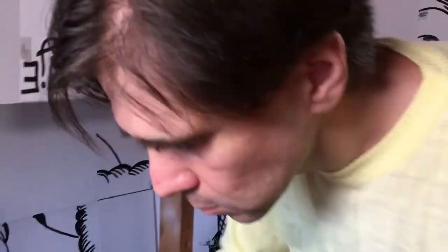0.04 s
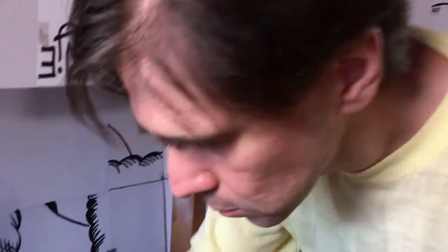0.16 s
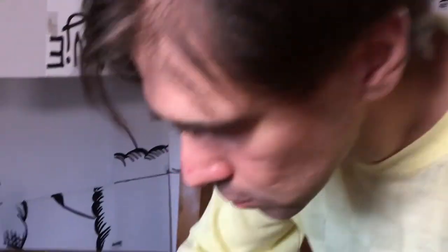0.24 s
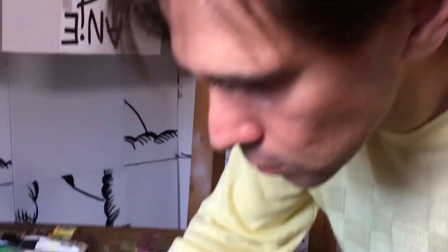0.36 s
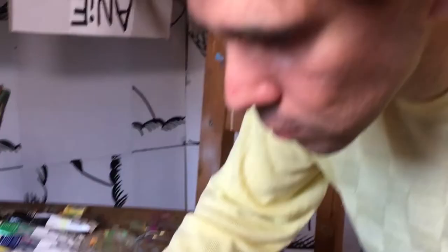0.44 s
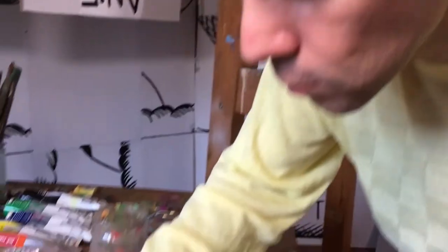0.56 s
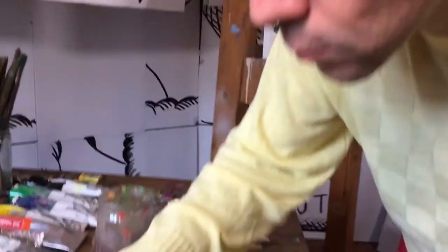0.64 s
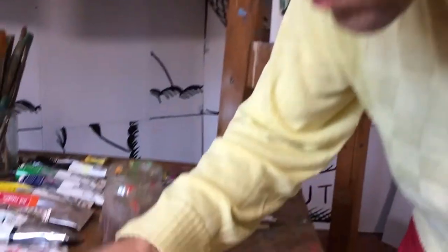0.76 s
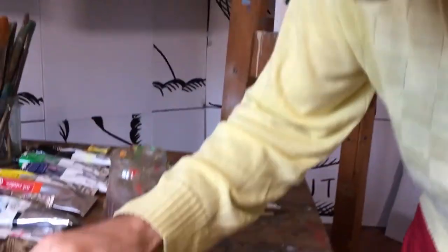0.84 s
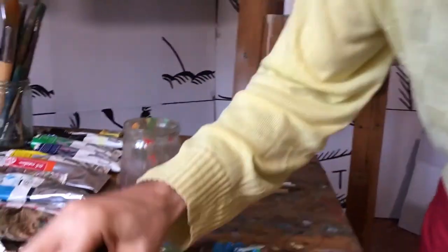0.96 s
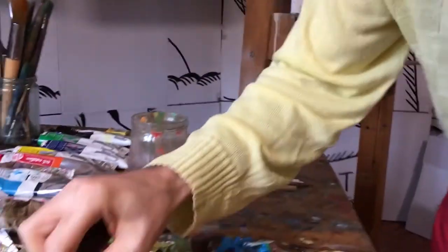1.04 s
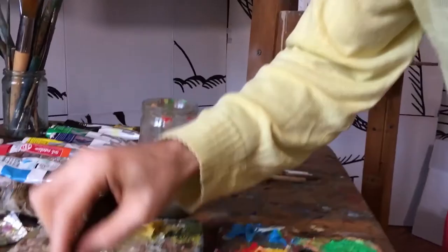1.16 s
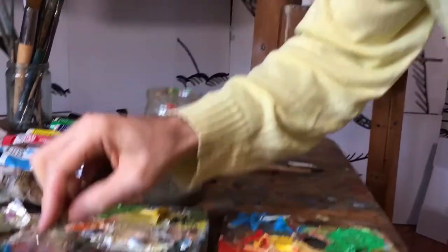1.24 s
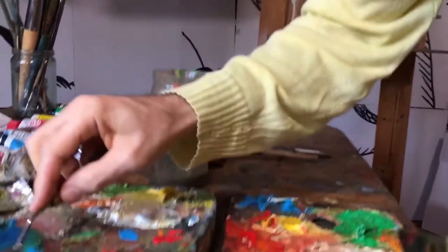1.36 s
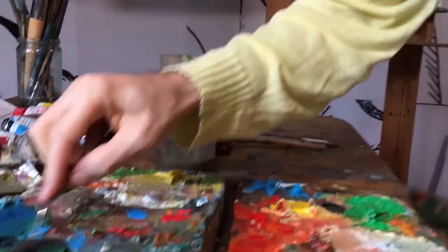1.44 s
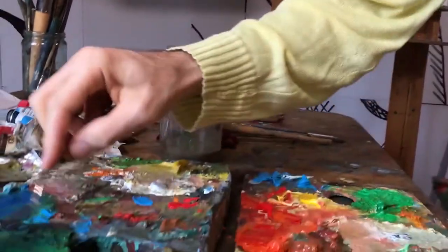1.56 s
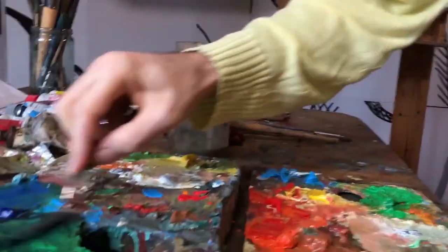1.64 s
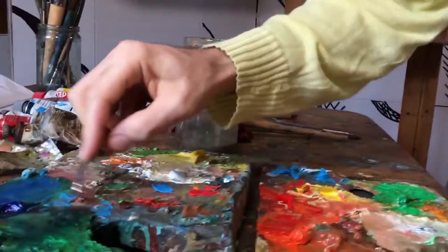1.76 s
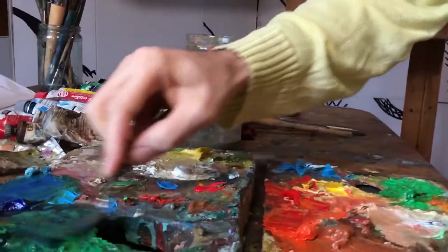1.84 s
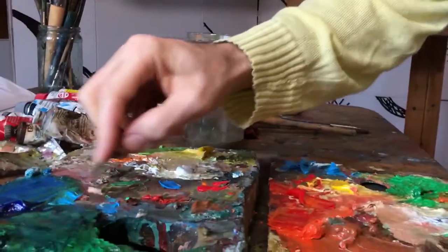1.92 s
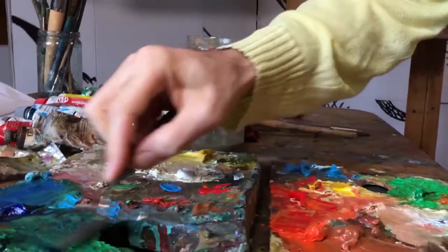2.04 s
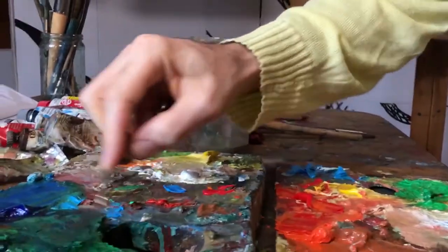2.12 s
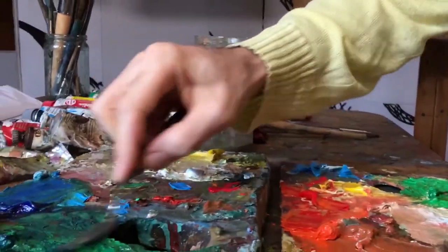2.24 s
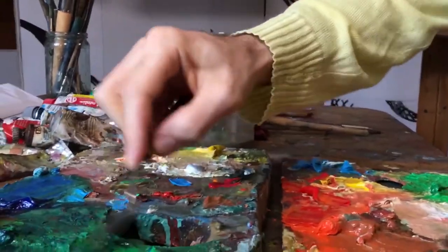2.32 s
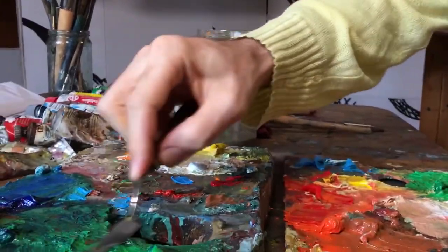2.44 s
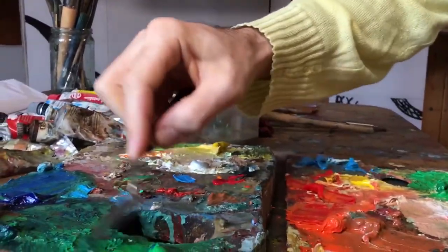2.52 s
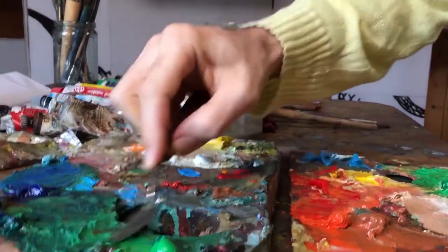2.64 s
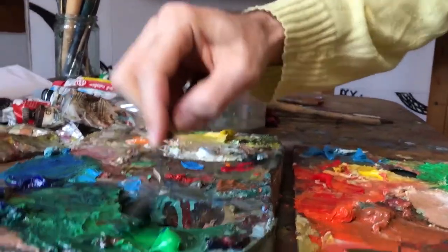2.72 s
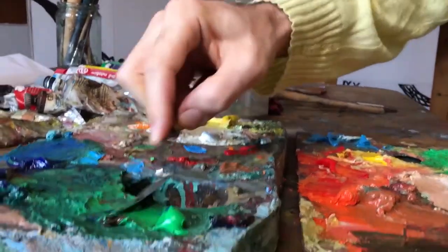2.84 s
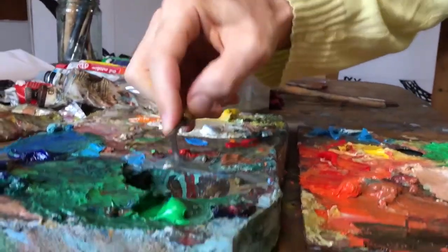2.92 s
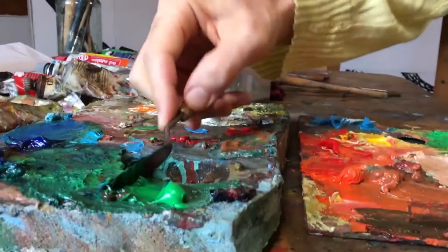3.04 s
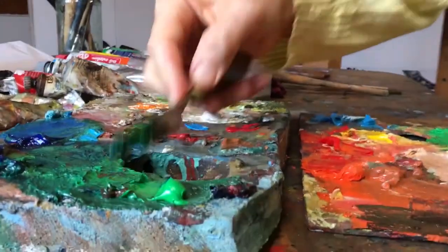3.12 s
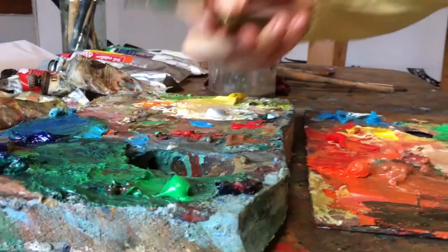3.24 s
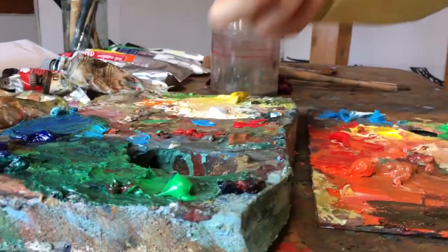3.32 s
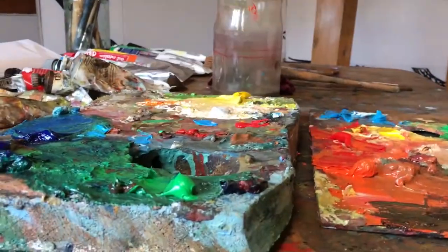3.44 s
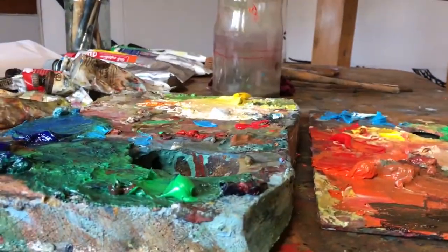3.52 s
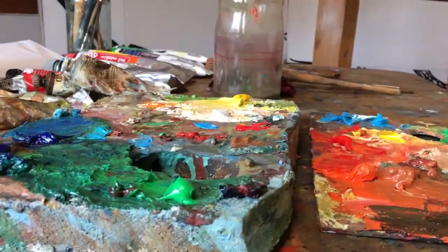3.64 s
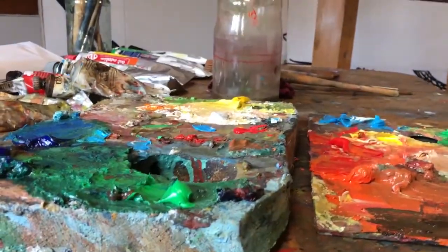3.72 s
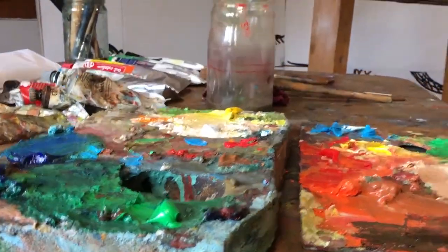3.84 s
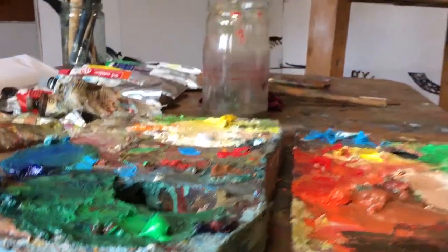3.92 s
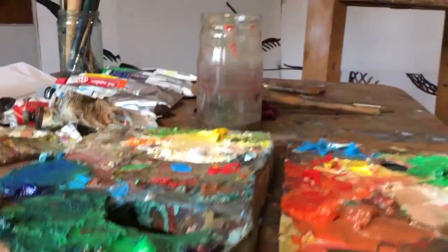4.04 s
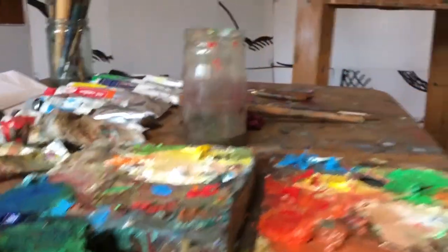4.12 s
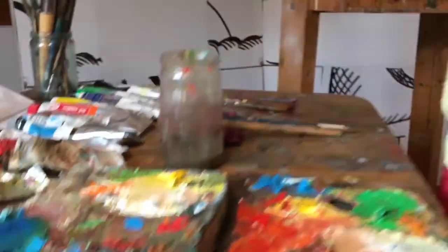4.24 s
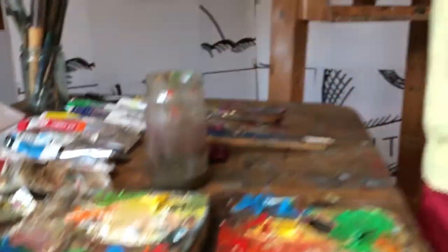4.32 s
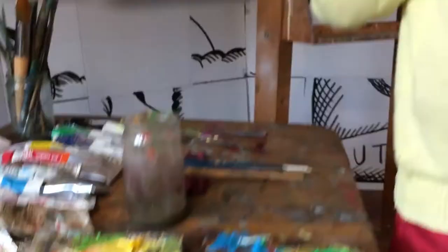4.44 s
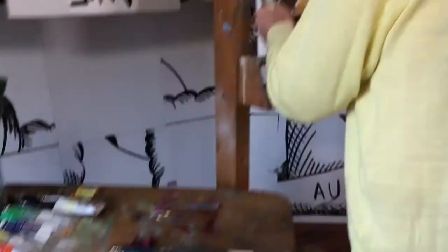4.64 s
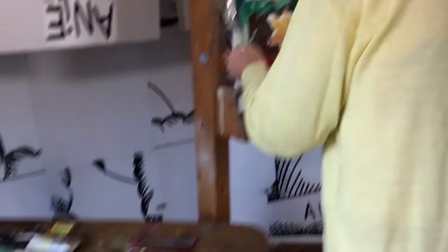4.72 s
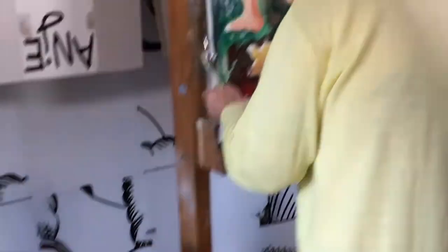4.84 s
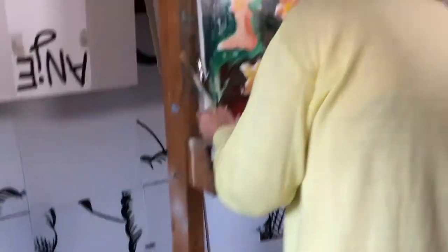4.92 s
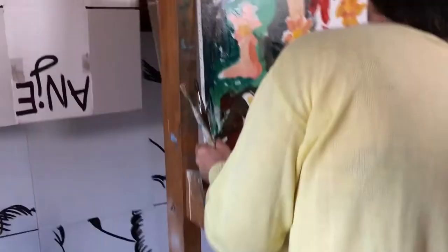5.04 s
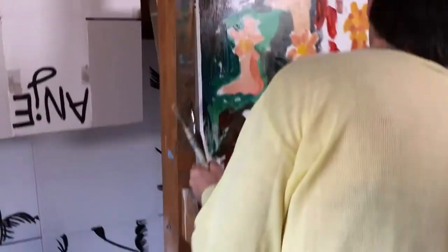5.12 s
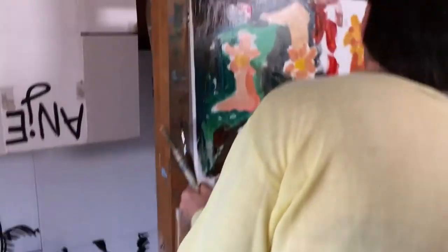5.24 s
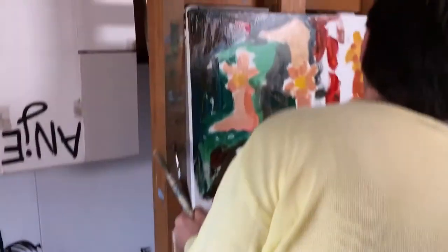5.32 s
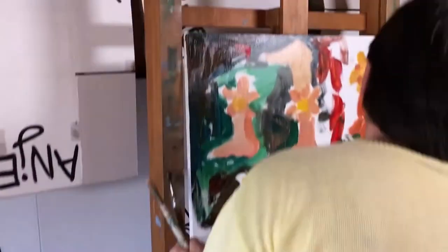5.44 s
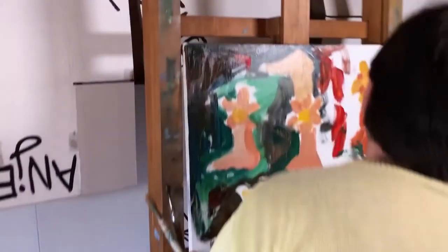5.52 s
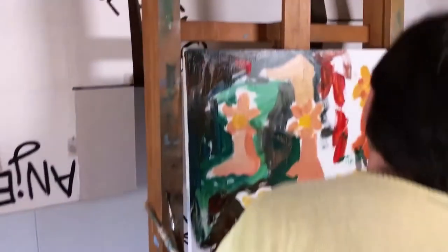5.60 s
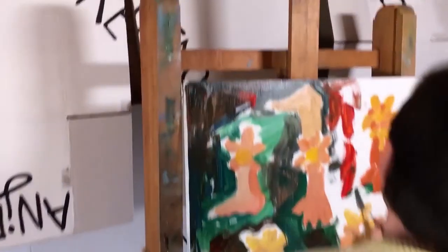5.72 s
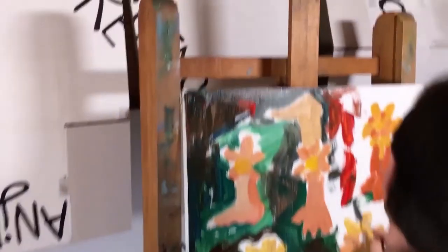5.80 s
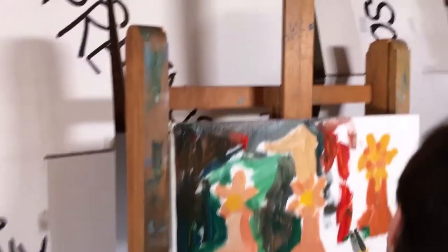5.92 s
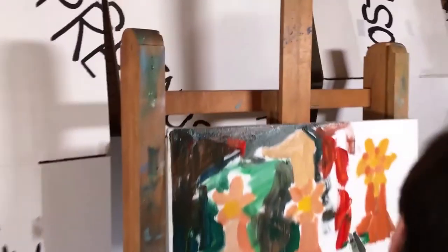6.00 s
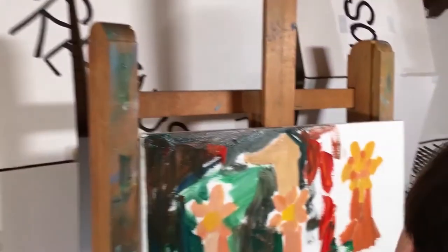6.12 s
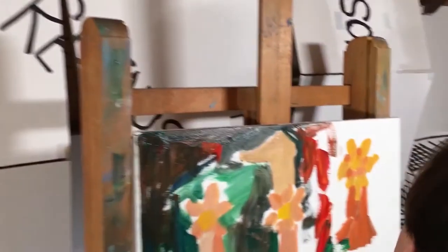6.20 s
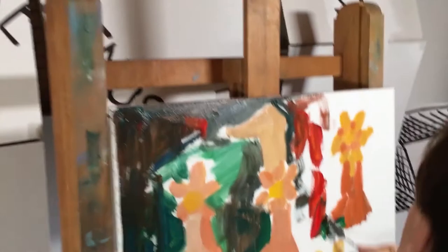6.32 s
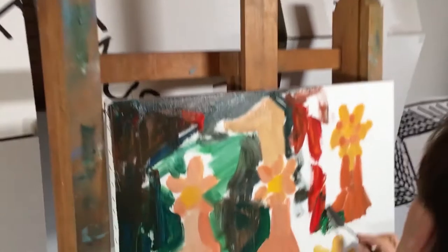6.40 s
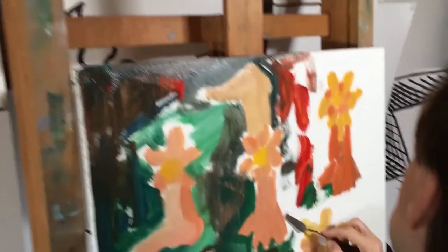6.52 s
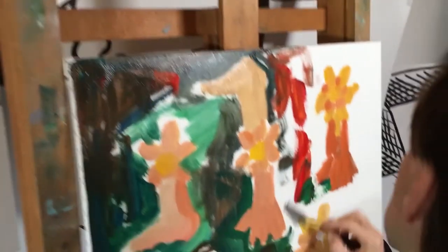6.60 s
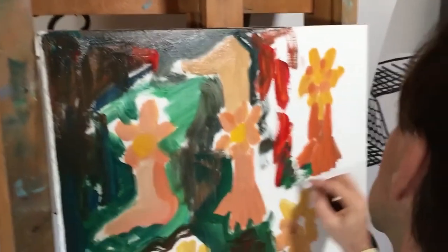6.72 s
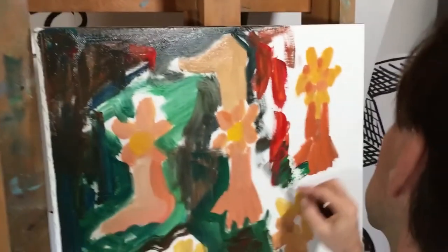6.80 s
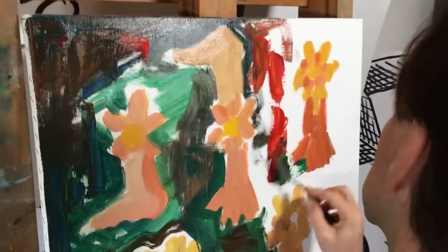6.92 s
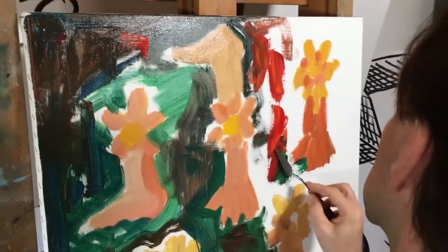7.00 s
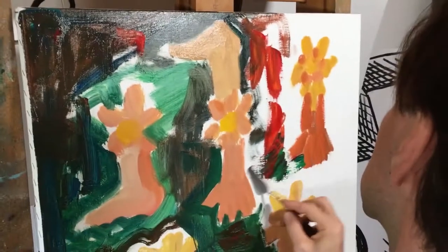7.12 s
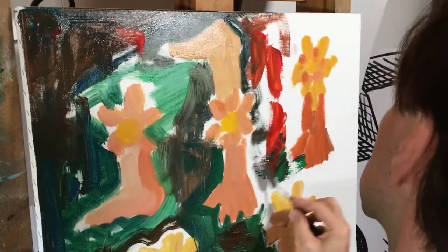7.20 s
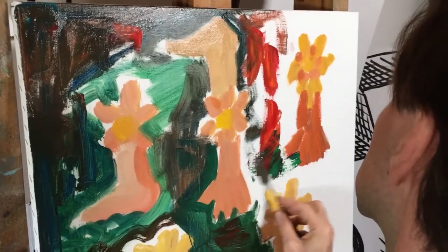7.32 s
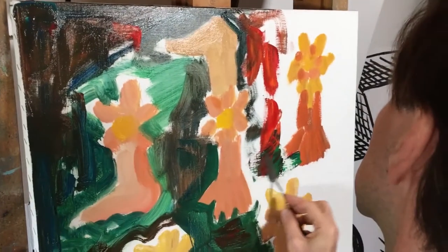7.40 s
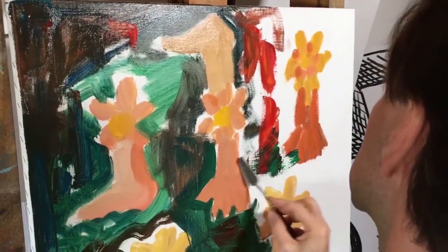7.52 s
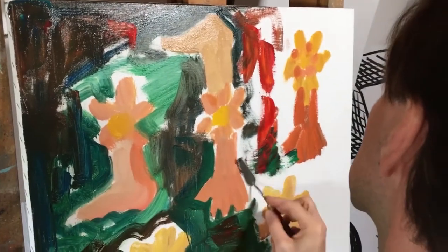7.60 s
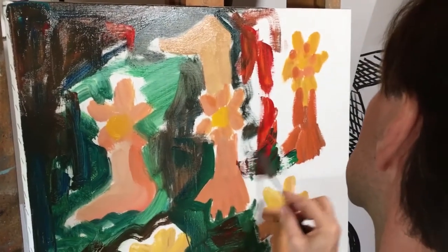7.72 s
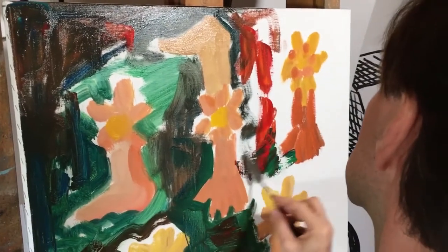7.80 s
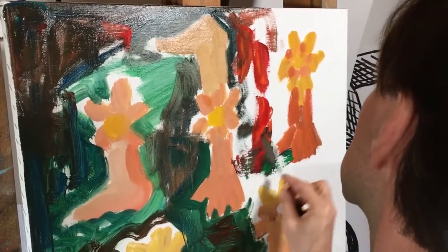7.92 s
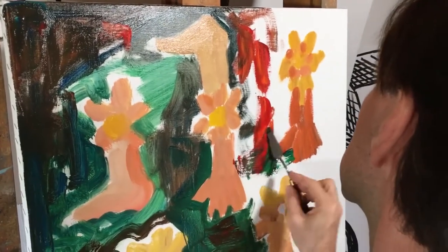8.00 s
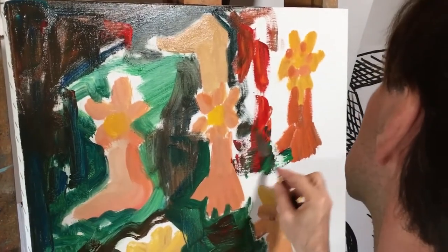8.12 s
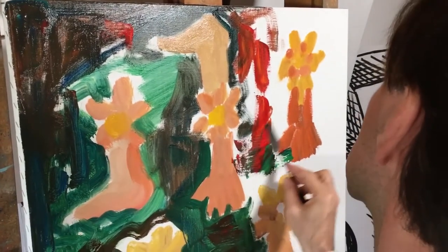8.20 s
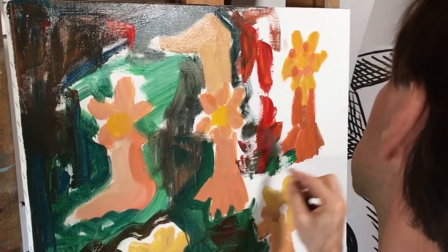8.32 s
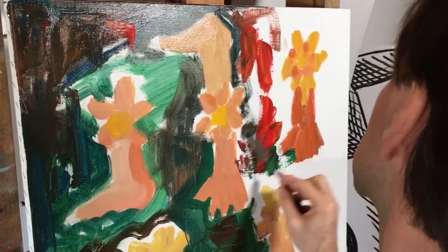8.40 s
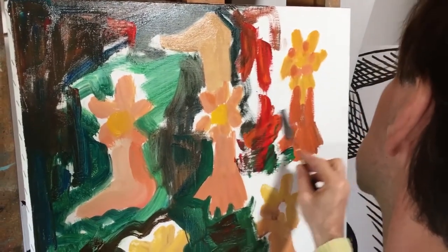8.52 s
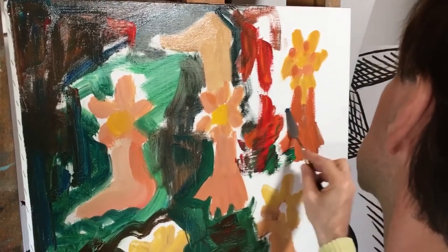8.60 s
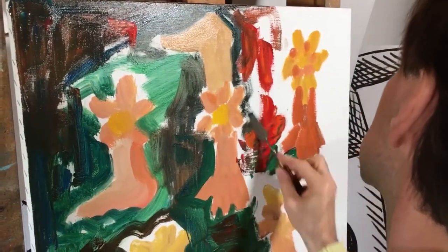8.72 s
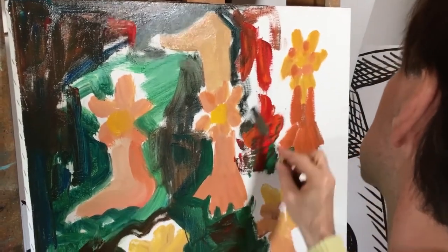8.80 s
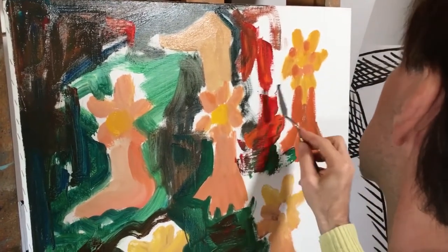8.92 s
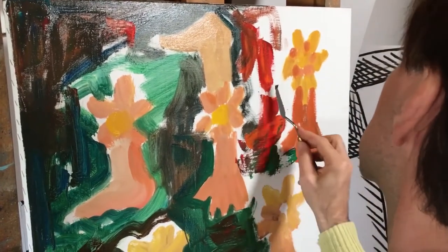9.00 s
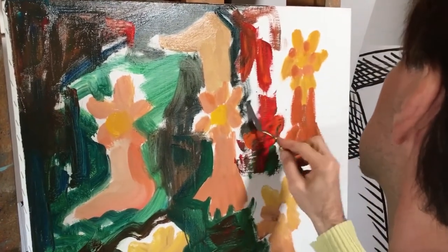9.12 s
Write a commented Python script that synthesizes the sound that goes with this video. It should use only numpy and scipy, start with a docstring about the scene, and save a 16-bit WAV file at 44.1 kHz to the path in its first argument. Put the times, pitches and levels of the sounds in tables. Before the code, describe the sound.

A small, bare, lightly echoing room with faint steady noise, heard by one microphone in mono. A tiny shoe scuff opens. From 0.65 s a steel palette knife dabs a paint-crusted wooden board: soft dull knocks with small ticks, some muffled by paint. At 1.3 s it clacks sharply on the bare rim with a tight bounce. Firmer woody taps come in little clusters from 1.9 to 2.55 s, then weak dabs until 3.2 s. A lull follows: clothes rustle softly around 4 to 5 s, gritty soles scuff at 4.6, 5.05 and 6.0 s. A quick rasp on canvas at 5.45 s precedes a faint brush-handle click at 5.7 s. After faint scrapes, a strong flick at 6.6 s starts regular strokes, roughly every 0.3 s until past 9 s: dry, bright rasps with thin blade ring, hollow cloth drumming and small landing taps between.

```python
"""A steel knife dabs paint on a crusted wooden palette, clacking once on its rim: struck wood and
steel modes. Soles then scuff and clothes rustle: grainy noise that follows each movement. A brush
handle clicks amid quick knife strokes on a stretched canvas: stick-slip grains rasp over the weave,
ring the blade and drum the cloth. Small, bare room with faint noise throughout; one microphone."""
import sys
import numpy as np
from scipy import signal
from scipy.io import wavfile

SR = 44100
rng = np.random.default_rng(int(sys.argv[2]) if len(sys.argv) > 2 else 0)


def store_wav(level_fs):
    """Save 16-bit WAV to argv[1]."""
    pcm = np.round(np.clip(np.atleast_2d(level_fs), -1, 1) * 32767)
    wavfile.write(sys.argv[1], SR, pcm.T.astype(np.int16))


N = 403515


def palette():
    """Each dab knocks the board, ticks the blade and shakes the table; one clack hits the bare rim."""
    # knife dabs: t/s, wood level/dB, steel tick level/dB, paint under blade/0-1, tick low-pass f/Hz
    dabs = [(0.655, -56, -78, 0.46, 7000), (.698, -45, -50.5, .1, 13000), (.876, -58.5, -77, 0.4, 6000),
            (.893, -52, -61, 0.52, 11100), (.929, -73, -50, .02, 10600), (1.087, -64.5, -60, .02, 15000),
            (1.110, -58, -55, 0.36, 12000), (1.1196, -52, -43.5, .25, 10000),
            (1.129, -52.5, -48.5, 0.73, 10800), (1.269, -51.5, -61, 0.88, 4000),
            (1.569, -49.5, -55.5, 0.92, 10400), (1.765, -44.5, -50, 0.63, 10400),
            (1.939, -41.5, -45, .95, 9500), (1.9707, -37, -45.5, 0.18, 7440),
            (1.987, -28.5, -33, .32, 7940), (2.155, -43.5, -51, 0.73, 9500),
            (2.177, -44, -43.5, 0.26, 8750), (2.204, -33, -43, 0, 9800), (2.342, -42.5, -48.5, .22, 10900),
            (2.361, -38, -45.5, 0.7, 12000), (2.393, -32.5, -39, 0.2, 11200),
            (2.551, -32.5, -47.5, 0, 15000), (2.754, -55, -72, 0.68, 5000), (2.935, -48, -59, 0.64, 7860),
            (3.026, -53.5, -56.5, 0.24, 6800), (3.117, -53, -67, 0.44, 8000),
            (3.189, -55.5, -56, 0.46, 8200)]
    # board modes: f/Hz, level/dB
    board_modes = [(431, 7), (732, 2.5), (1130, -12), (1244, -20), (1475, 3.5), (1992, 1.5)]
    # dull part of a dab: f/Hz, level/dB
    crust = [(100, -25), (280, -25.5), (440, 10), (560, -1.5), (730, 1.5), (920, -4), (1300, 10),
             (1520, -11), (1750, -14), (2100, -5.5), (2600, -14.5), (3400, -11), (8000, -63)]
    # blade modes: f/Hz, level/dB
    steel_modes = [(5600, 2.5), (7440, -9), (7747, 6.5), (9250, -13), (9540, -2)]
    # broad part of the steel tick: f/Hz, level/dB
    tick = [(800, -65), (2500, -3.5), (3400, 4), (4800, 5), (6200, 4.5), (9000, 10), (11000, 7),
            (16000, 12.5)]
    # table under the palette: f/Hz, level/dB
    thud = [(30, -46), (55, -23), (75, -4.5), (98, -19), (125, -5), (170, -1), (270, 0), (500, 3),
            (2000, -85.5)]
    # knife on the rim, with bounces: t/s, level/dB
    clacks = [(1.292, -28), (1.2943, -28), (1.3, -25), (1.309, -41)]
    # rim modes: f/Hz, level/dB
    rim_modes = [(345, 3), (392, 4), (1448, 1), (1540, -1), (2700, -10), (3838, -8), (5400, -5), (7800, -5),
                 (7930, -2), (8021, -1), (8118, -3), (8306, -5), (9071, -7)]
    # broad part of the clack: f/Hz, level/dB
    crack = [(100, -38), (250, -10.5), (370, 18.5), (520, 5.5), (900, -2.5), (1470, 7), (2000, -1),
             (5200, 2), (6500, -2.5), (8100, 7), (11500, -4), (16000, -15)]
    bare_drag_s, paint_drag_s = 0.002, 0.025  # the blade takes longer to stop in paint
    bare_thud_db, paint_thud_db = -17.5, 1.5  # re wood level: paint passes more of the push to the table
    bare_spot_hz, paint_spot_hz = 1408, 463  # the spot answers lower in paint
    spot_db, spot_width_hz, spot_spread_octaves = -3, 270, 0.1

    out, table = np.zeros(N), colour(thud)
    for s, wood_db, tick_db, paint, top_hz in dabs:
        drag_s = bare_drag_s * (paint_drag_s / bare_drag_s) ** paint
        thud_db = wood_db + np.interp(paint, [0, 1], [bare_thud_db, paint_thud_db])
        wood = body(board_modes, 0.055, crust, ring_db=-7, vary_db=2.5)
        steel = body(steel_modes, 0.09, tick, ring_db=-17, vary_db=2)

        click = 3.14 * np.exp(-drag_s / 0.0032)  # thick paint swallows the click
        force = soften(contact(drag_s, click), 1950)
        shift = 2 ** (spot_spread_octaves * rng.standard_normal())
        bare_spot = blow(narrow(force, bare_spot_hz * shift, spot_width_hz))
        paint_spot = blow(narrow(force, paint_spot_hz * shift, spot_width_hz))
        spot = (1 - paint) * bare_spot + paint * paint_spot

        knock = blow(through(force, wood)) + amp(spot_db) * blow(spot)
        add(out, s, amp(wood_db) * blow(knock))
        ting = cut(through(force, steel), top_hz, "low", order=5)
        add(out, s, amp(tick_db) * blow(ting))
        push = contact(drag_s + 0.015, click=0.217)
        add(out, s, amp(thud_db) * blow(through(push, table)))

        squash = swing(0.005, 0.046)  # the blade squashes paint just before and after it meets the board
        squelch = through(squash * grains(len(squash), 1800, 3.4), wood)
        add(out, s - 0.008, amp(wood_db - 11) * evened(squelch))

    rim = body(rim_modes, 0.11, crack, ring_db=-6, vary_db=0)
    for s, db in clacks:
        add(out, s, amp(db) * blow(through(contact(0.0022, click=0.32), rim)))
    return out


def canvas():
    """The blade rasps over the weave, rings, and drums the cloth, whose pitch shifts with the contact."""
    # strokes: t of full speed/s, rise/s, fall/s, rasp level/dB, blade level/dB, mid-stroke canvas f/Hz
    strokes = [(5.445, 0.049, 0.12, -37, -47, 680), (5.89, .11, 0.1, -52, -65, 536),
               (6.29, 0.065, .11, -62, -87, 500), (6.554, .04, 0.065, -57, -80, 500),
               (6.63, .048, 0.043, -34.5, -42.5, 630), (6.848, .03, 0.069, -52, -60, 514),
               (6.926, 0.068, 0.087, -41.5, -63, 623), (7.205, .036, 0.14, -50, -73, 507),
               (7.49, 0.043, 0.07, -39.5, -42, 556), (7.75, 0.093, 0.062, -40.5, -43, 890),
               (8.025, .085, 0.088, -35.5, -38.5, 713), (8.285, 0.077, 0.11, -35.5, -34.5, 1050),
               (8.665, 0.12, 0.073, -42.5, -46, 610), (8.935, 0.097, 0.086, -36.5, -39.5, 1000)]
    # blade lands or catches: t/s, level/dB, rumble level of the rocked easel/dB
    touches = [(5.779, -48, -84), (6.509, -57, -82), (6.786, -48, -74), (6.876, -40.5, -68),
               (7.084, -46, -74), (7.173, -42.5, -83), (7.38, -43, -60), (7.469, -42, -65),
               (7.658, -49.5, -66), (7.725, -41, -76), (7.93, -46, -90), (8.2, -43.5, -64),
               (8.499, -42.5, -73.5), (8.551, -36.5, -88), (8.583, -43.5, -84), (8.837, -41.5, -85),
               (9.144, -39.5, -75)]
    # cloth modes: f/Hz, level/dB
    cloth_modes = [(285, -1), (383, 5), (454, 7), (655, 0), (722, 5), (862, 2), (970, 1), (1065, 0),
                   (1156, -5), (1320, -6), (1455, -1), (1819, -3)]
    # broad part of the drumming: f/Hz, level/dB
    drum_spectrum = [(40, -106), (130, -32), (210, -9), (320, -5.5), (600, 11.5), (1200, 8.5), (1700, 1.5),
                     (2600, -6.5), (5000, -27.5)]
    # rasp of the weave: f/Hz, level/dB
    rasp_spectrum = [(300, -33), (1200, 1), (2200, 2.5), (3300, 2.5), (5000, 3.5), (6800, 2), (8300, 2.5),
                     (9700, -1), (11500, -4), (14000, -10.5), (16000, -23)]
    # resonances of the flexing blade: f/Hz, width/Hz, level/dB
    blade_modes = [(8140, 120, 4), (8590, 180, 4.5), (9210, 390, 4), (10030, 180, -5)]
    # stretcher on the easel: f/Hz, level/dB
    frame = [(40, -25), (75, -8), (98, -26), (130, 0.5), (170, -3.5), (260, -1), (600, -41), (2000, -80)]
    rest_hz, glide_octaves = 463, 0.5  # pitch under a still blade; climb along a stroke
    # a flick skims the cloth; drumming gains lean_db for each doubling of the rise time
    flick_s, flick_drum_db, lean_db = 0.054, -5, 6.5
    stroke_frame_db = -80
    # after each touch the blade creeps over the weave; levels re touch
    creep_rise_s, creep_fall_s = 0.022, 0.11
    creep_rasp_db, creep_blade_db, creep_drum_db = -22, -24, -5

    rasp, flex, drum, sing, rumble = np.zeros((5, N))
    pitch_hz = np.full(N, float(rest_hz))

    def scrape(start_s, speed, hz, rasp_db, blade_db, drum_db, frame_db):
        """One slide of the blade; ridges of paint grip and let go."""
        n = len(speed)
        grip = soften(soften(rng.standard_normal(n), 70), 70)
        catch = amp(2 * evened(grip))
        slips = evened(catch * grains(n, 2500, 2.8))
        weave = evened(np.sqrt(catch) * grains(n, 15000, 1.9))
        add(rasp, start_s, amp(rasp_db) * speed ** 1.15 * weave)
        add(flex, start_s, amp(blade_db) * speed ** 1.45 * grains(n, 6000, 1.2))
        add(drum, start_s, amp(drum_db - 1.5) * speed ** 0.71 * slips)
        add(rumble, start_s, amp(frame_db) * speed * slips)
        add(sing, start_s, amp(drum_db - 5) * speed * evened(narrow(slips, hz, 294)))

    for s, rise_s, fall_s, rasp_db, blade_db, mid_hz in strokes:
        speed = swing(rise_s, fall_s)
        hz = mid_hz * 2 ** (glide_octaves * np.linspace(-0.5, 0.5, len(speed)))
        drum_db = rasp_db + flick_drum_db + lean_db * np.log2(rise_s / flick_s)
        scrape(s - rise_s, speed, hz, rasp_db, blade_db, drum_db, stroke_frame_db)
        add(pitch_hz, s - rise_s, hz - rest_hz)

    for s, db, frame_db in touches:
        force = contact(0.008, click=0.4)
        t = np.arange(len(force)) / SR
        # the blade loads the cloth: pitch sinks
        sinking_hz = pitch_hz[round(s * SR)] * (0.79 + 0.41 * np.exp(-t / 0.013))
        add(sing, s, amp(db) * blow(narrow(force, sinking_hz, 364)))
        add(drum, s, amp(db - 11.5) * blow(force))
        add(rasp, s, amp(db - 9.5) * blow(soften(contact(0.016, click=0.078), 2000)))
        creep = swing(creep_rise_s, creep_fall_s)
        scrape(s, creep, sinking_hz[-1], db + creep_rasp_db, db + creep_blade_db,
               db + creep_drum_db, frame_db)

    blade = sum(amp(db) * resonate(flex, np.full(N, hz), width_hz) for hz, width_hz, db in blade_modes)
    blade *= np.std(flex) / np.std(blade)
    cloth = through(drum, body(cloth_modes, 0.1, drum_spectrum, ring_db=0, vary_db=3))
    cloth = cut(cloth + sing, 320, "high", order=4)  # little of the cloth's sound lies below 320 Hz
    return through(rasp, colour(rasp_spectrum)) + blade + cloth + through(rumble, colour(frame))


def painter():
    """Gritty soles slide on the floor, clothes rustle, and a brush handle clicks in the other hand."""
    # sole scuffs: t of full speed/s, rise/s, fall/s, level/dB
    scuffs = [(.011, 0.027, 0.056, -49.5), (3.765, 0.095, 0.13, -54), (4.061, 0.034, 0.044, -57),
              (4.587, .007, 0.087, -43), (5.051, .008, 0.067, -39), (5.129, 0.0065, 0.035, -49.5),
              (5.245, 0.013, 0.047, -49), (6.0, .007, 0.082, -39.5)]
    # sole on floor, also the broad part of the handle click: f/Hz, level/dB
    sole = [(100, -45), (250, -25), (600, -16.5), (1800, -22.5), (2900, -12), (4000, -2.5), (5000, 0.5),
            (6500, -5), (8500, -8), (11000, -16.5), (16000, -30)]
    # clothes: t of full speed/s, rise/s, fall/s, level/dB
    rustles = [(.08, .15, 0.32, -69), (3.95, 0.55, 0.93, -63), (4.32, 0.17, 0.31, -60),
               (4.69, 0.14, 0.39, -62.5), (5.2, 0.36, 0.61, -67)]
    # rustling fabric: f/Hz, level/dB
    fabric = [(59, -84), (100, -27), (170, -11), (492, -5), (558, -3.5), (662, -4), (4870, -2),
              (8110, -3.5), (16000, -19)]
    handle_modes = [(4150, -3), (4400, 0), (7500, -10), (11750, -5)]  # f/Hz, level/dB
    click_s, click_db = 5.686, -59

    out = rubbing(scuffs, sole, per_s=9000, spread_db=4)
    out += rubbing(rustles, fabric, per_s=12000, spread_db=2.5)
    handle = body(handle_modes, 0.1, sole, ring_db=0, vary_db=6)
    add(out, click_s, amp(click_db) * blow(handle))
    return out


def room_noise():
    """Steady, faint coloured noise."""
    # room noise: f/Hz, level/dB
    air = [(20, -20), (45, -24), (72, 1), (95, -9.5), (160, -2), (240, -8.5), (300, -4.5), (500, 1.5),
           (700, 1.5), (1040, -4.5), (1650, -5), (16000, -14)]
    return amp(-70.5) * evened(through(rng.standard_normal(N), colour(air)))


def room(x, wet_db, count=3):
    """Adds echo patterns that keep shifting, then scales so that the total power is about kept."""
    angle = 2 * np.pi * 0.8 * np.arange(N) / SR  # 0.8 Hz
    wet = np.zeros(N)
    for k in range(count):
        wet += through(x * np.cos(angle + np.pi * k / count), reflections())
    wet *= np.sqrt(2 / count)
    return (x + amp(wet_db) * wet) / np.hypot(1, amp(wet_db))


def reflections():
    """Dense echoes of random sign, each band dying at its own speed."""
    # room decay: f/Hz, t60/s
    decay = [(150, .42), (400, .33), (1000, .35), (3000, .39), (7500, .4), (15000, .29)]
    t = np.arange(SR * 3 // 4) / SR
    taps = rng.choice([-1., 1.], len(t)) * (rng.random(len(t)) < 4000 / SR) * (t > 0.004)
    hz, when_s, bands = signal.stft(taps, SR, nperseg=256)
    fade = amp(-60 * when_s / read(decay, hz)[:, None])
    tail = signal.istft(bands * fade, SR, nperseg=256)[1]
    return tail / np.linalg.norm(tail)


def rubbing(moves, spectrum, per_s, spread_db):
    """Grainy friction that follows the speed of each movement."""
    out = np.zeros(N)
    for s, rise_s, fall_s, db in moves:
        speed = swing(rise_s, fall_s)
        add(out, s - rise_s, amp(db) * speed * grains(len(speed), per_s, spread_db))
    return through(out, colour(spectrum))


def swing(rise_s, fall_s):
    """Speed of one movement, peak 1: gathers for rise_s, dies away for fall_s."""
    t = np.arange(-rise_s, fall_s, 1 / SR)
    return np.cos(np.pi / 2 * np.where(t < 0, t / rise_s, t / fall_s)) ** 2


def contact(drag_s, click):
    """Force of a blow: a click, then gritty chatter that swells and dies at a rate set by drag_s."""
    t = np.arange(SR // 5) / SR
    force = grains(len(t), 5000, 2.86) * (np.exp(-t / drag_s) - np.exp(-3 * t / drag_s))
    force /= np.linalg.norm(force)
    force[0] += click
    return force


def grains(length, per_s, spread_db):
    """Stick and slip: random tiny snaps of uneven size, rms 1."""
    size = amp(spread_db * np.minimum(rng.exponential(1, length), 4))
    snaps = rng.random(length) < per_s / SR
    return evened(size * rng.standard_normal(length) * snaps)


def body(modes, t60_s, spectrum, ring_db, vary_db):
    """Response of an object: a dead, broad part plus modes whose strengths vary at random with the spot."""
    t = np.arange(SR // 6) / SR
    ring = np.zeros(len(t))
    for hz, db in modes:
        level_db = db + vary_db * rng.standard_normal() - 60 * t / t60_s
        ring += amp(level_db) * np.cos(2 * np.pi * hz * t)
    response = amp(ring_db) * ring / np.linalg.norm(ring)
    add(response, 0, colour(spectrum))
    return response / np.linalg.norm(response)


def colour(spectrum, size=4096):
    """Causal minimum-phase response of energy 1 with the given spectrum."""
    log_gain = np.log(amp(read(spectrum, abs(np.fft.fftfreq(size, 1 / SR)))))
    response = np.fft.ifft(np.exp(np.conj(signal.hilbert(log_gain)))).real[:size // 2]
    return response / np.linalg.norm(response)


def resonate(x, hz, width_hz):
    """A resonance that follows the curve hz: shift to 0 Hz, low-pass, shift back."""
    turn = np.exp(2j * np.pi * np.cumsum(hz) / SR)
    r = np.exp(-np.pi * width_hz / SR)
    return 2 * (turn * signal.lfilter([1 - r], [1, -r], x / turn)).real


def narrow(x, hz, width_hz):
    """A steep resonance at a fixed or moving pitch: two in series."""
    hz = hz * np.ones(len(x))
    return resonate(resonate(x, hz, width_hz), hz, width_hz)


def soften(x, corner_hz):
    """A soft contact loses treble above its corner."""
    r = np.exp(-2 * np.pi * corner_hz / SR)
    return signal.lfilter([1 - r], [1, -r], x)


def cut(x, edge_hz, kind, order):
    """Butterworth low-pass or high-pass."""
    return signal.sosfilt(signal.butter(order, edge_hz, kind, fs=SR, output="sos"), x)


def through(x, response):
    """Filters x, keeping its length."""
    return signal.fftconvolve(x, response)[:len(x)]


def read(points, hz):
    """Interpolates a table on a logarithmic frequency axis."""
    f, value = np.transpose(points)
    return np.interp(np.log(hz + 1), np.log(f + 1), value)


def amp(db):
    """Decibels to amplitude."""
    return 10 ** (np.asarray(db) / 20)


def evened(x):
    """Scales to rms 1."""
    return x / np.sqrt(np.mean(x ** 2) + 1e-20)


def blow(x):
    """Scales a short sound to the energy of 10 ms at rms 1."""
    return x / np.sqrt(np.sum(x ** 2) / (SR / 100) + 1e-20)


def add(mix, s, sound):
    """Mixes a sound in at time s, trimmed to fit."""
    start = round(s * SR)
    sound = sound[max(-start, 0):]
    part = mix[max(start, 0):][:len(sound)]
    part += sound[:len(part)]


def scene():
    """Palette, canvas and painter in the room, over faint noise."""
    mix = room(palette(), wet_db=-3.5)
    mix += room(canvas(), wet_db=-3.5)
    mix += room(painter(), wet_db=-5)
    mix += room_noise()
    return mix[None]


def record(dry):
    """Band limit: linear-phase low-pass at 16.1 kHz."""
    low_pass = signal.firwin(511, 16100, window=("kaiser", 9), fs=SR)
    return signal.oaconvolve(dry, low_pass[None], "same")


dry = scene()
out = record(dry)
store_wav(out)
```